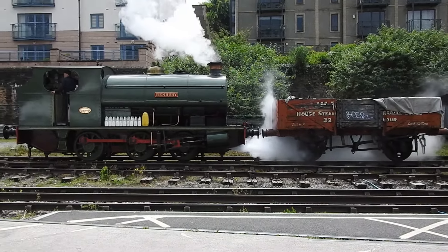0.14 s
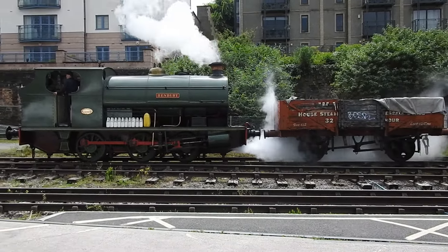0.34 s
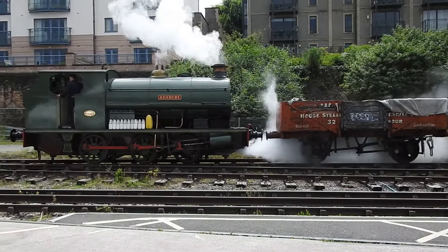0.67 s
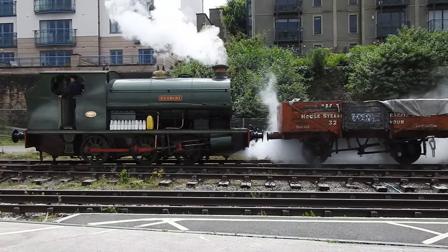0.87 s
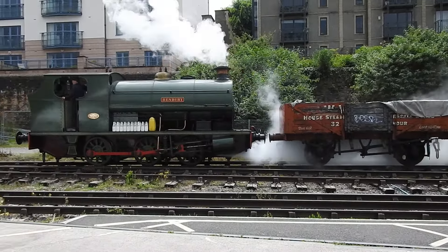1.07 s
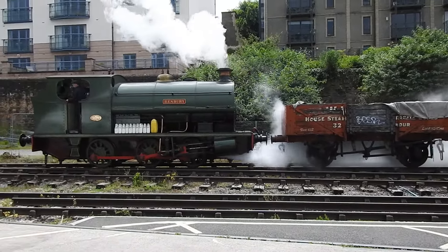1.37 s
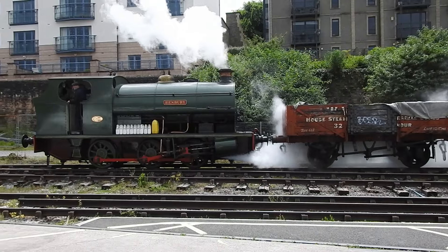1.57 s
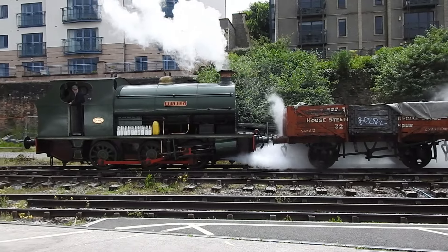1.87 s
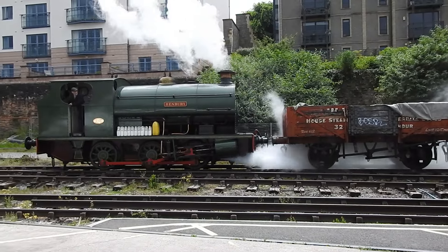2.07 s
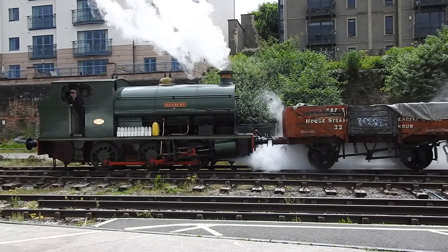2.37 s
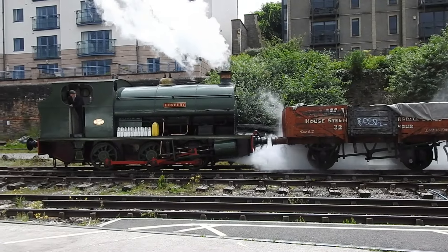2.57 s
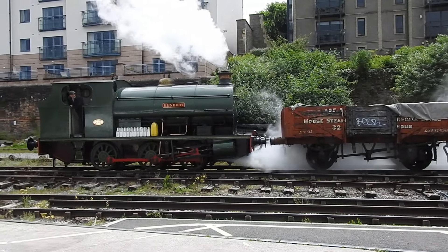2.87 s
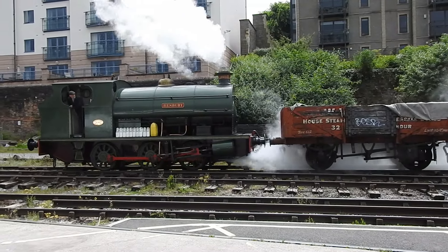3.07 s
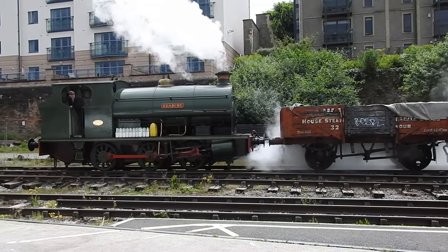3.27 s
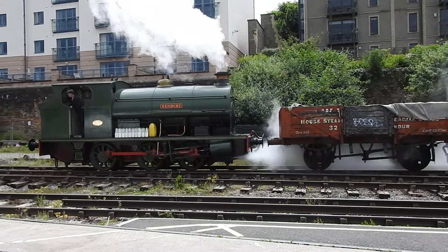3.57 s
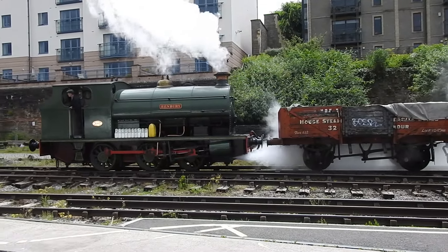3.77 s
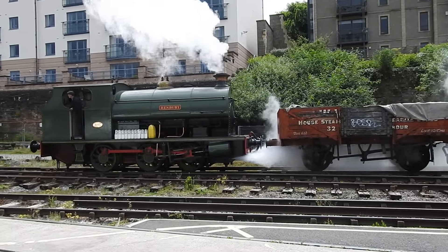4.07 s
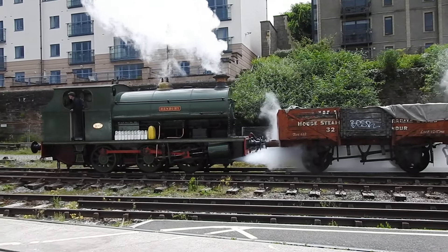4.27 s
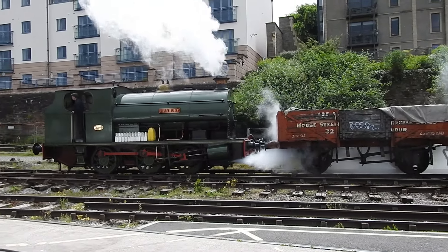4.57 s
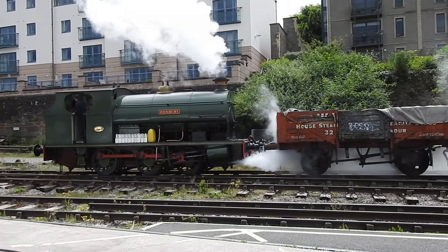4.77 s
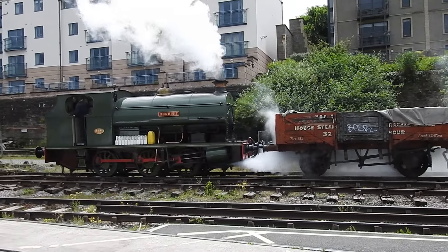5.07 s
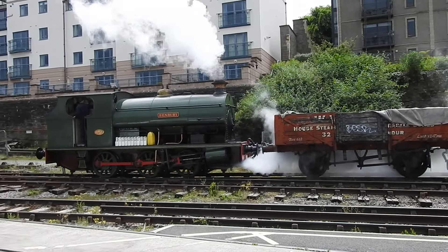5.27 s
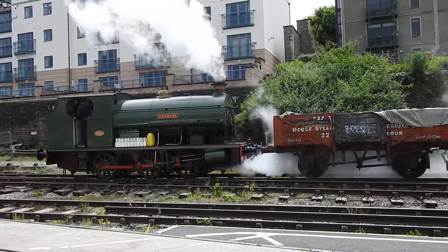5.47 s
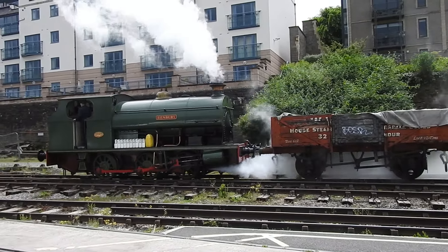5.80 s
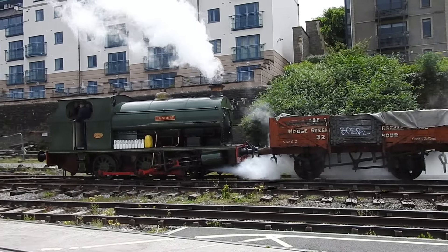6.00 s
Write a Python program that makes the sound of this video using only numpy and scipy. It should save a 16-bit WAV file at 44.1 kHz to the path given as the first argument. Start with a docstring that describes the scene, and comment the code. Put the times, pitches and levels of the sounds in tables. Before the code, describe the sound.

A loud, unbroken steam hiss from a locomotive, with breathy lower puffs, rolling rumble, dull rail-joint thuds and a few metallic coupling clanks.

```python
"""Steam engine in a rail yard

A safety valve jet hisses without pause and drain cocks blow in surges: banded, fluttering noise.
Wheels roll and the yard drones, as lower noise; wagons thud over rail joints, a flange squeaks
and couplings clank, as decaying modes, short sines and rattle noise.
The ground returns a short echo of the steam; two close microphone ports pick up the whole."""
import sys
import numpy as np
from scipy import signal
from scipy.fft import rfft, irfft, next_fast_len
from scipy.io import wavfile
from scipy.ndimage import uniform_filter1d

SR = 44100
rng = np.random.default_rng(int(sys.argv[2]) if len(sys.argv) > 2 else 0)


def pcm_store(signal):
    """Save signal as 16-bit PCM."""
    levels = np.round(np.clip(np.atleast_2d(signal), -1, 1) * 32767)
    wavfile.write(sys.argv[1], SR, levels.astype(np.int16).T)


N = 270774
SIZE = next_fast_len(N + SR // 2)
HZ = np.arange(SIZE // 2 + 1) * SR / SIZE
TIME_S = np.arange(N) / SR

# Safety valve jet as the plume drifts: t/s, level/dB
VALVE_LEVEL = [(0, -12), (.6, -12.5), (1.1, -12), (1.4, -13.5), (1.8, -12.5), (2.15, -11.5), (2.42, -15.5),
               (2.55, -13.5), (2.65, -14.5), (3.15, -12.5), (3.8, -12.5), (4.6, -11.5), (5.2, -12.5),
               (5.7, -12.8), (6.14, -12.5)]
# Jet spectrum, relative density: f/Hz, density/dB
JET_COLOUR = [(600, -28.5), (1500, -17), (2500, -12.5), (2900, -12.5), (3300, -7), (4200, -9.5),
              (5100, -7.5), (5600, -3), (6300, 0.5), (7000, -5), (8000, -9), (9300, -14), (11000, -25.5),
              (13000, -26), (15000, -29)]
TREBLE_FOLLOW, LOW_FOLLOW = 1.6, -1.1  # extra dB per dB of level swing, per octave from 6300 Hz

# Drain cock blows: start/s, length/s, level/dB, pipe tone relative to level/dB
COCK_BLOWS = [(-.1, 0.19, -28.5, -4), (0.545, .3, -34, -13), (1.084, 0.41, -24.5, -4.5),
              (1.42, 0.28, -26, 1), (1.895, 0.43, -30.5, 1.5), (2.265, 0.25, -26.5, -6),
              (2.496, 0.49, -27.5, -0.2), (2.973, 0.24, -28, -5), (3.443, 0.14, -27.5, -5),
              (5.15, 0.3, -34.5, -9), (5.548, 0.17, -24, -3), (5.924, 0.16, -27, -1)]
# Steam rush spectrum, relative density: f/Hz, density/dB
RUSH_COLOUR = [(200, -8), (500, -13), (800, -2.5), (1050, 0.5), (1230, -4), (1390, -6), (1600, -4),
               (2100, -5), (3200, -10.5), (5000, -34), (9000, -50)]
# Breathy tone of the drain pipe, relative density: f/Hz, density/dB
PIPE_COLOUR = [(1400, -16), (1520, -5.5), (1590, 2.5), (1660, -1), (1780, -24)]
RUSH_ATTACK_S, RUSH_RELEASE_S = 0.046, 0.13
TONE_ATTACK_S, TONE_RELEASE_S = 0.11, 0.11
LEAK_DB, LEAK_TONE_DB = -37, -37  # seeps out between blows

# Wheels rolling on the rails: t/s, level/dB
ROLL_LEVEL = [(0, -24), (.36, -35), (.73, -28), (1.3, -32.5), (1.9, -27.5), (2.24, -32), (3.06, -30.5),
              (3.7, -31.5), (4.4, -38), (5.1, -30.5), (5.5, -28.5), (6.14, -31)]
# Rolling spectrum, relative density: f/Hz, density/dB
ROLLING_COLOUR = [(60, -26), (100, -8.5), (130, -5), (170, 3), (250, 0.5), (320, -6), (400, -10), (700, -9),
                  (950, -29)]
# Low drone of yard and breeze, relative density: f/Hz, density/dB
DRONE_COLOUR = [(25, -34), (35, -20), (50, -10), (70, -1), (95, -3), (120, -6.5), (150, -31.5)]
DRONE_DB, DRONE_FOLLOW = -35, 0.4  # level at mean rolling; dB per dB of rolling

# Wagon bodies thudding over rail joints: t/s, level/dB, pitch f/Hz
JOINT_THUDS = [(.008, -14.5, 138), (.05, -17, 149), (.074, -15, 141), (0.104, -17, 158), (1.697, -14, 251),
               (1.712, -15, 260), (1.731, -8.5, 257), (1.753, -14, 182), (1.805, -15.5, 176),
               (1.851, -21, 182), (2.983, -10, 210), (3.032, -14, 190), (3.22, -14, 174), (3.612, -19, 198),
               (3.79, -19.5, 276), (4.801, -20, 175), (4.82, -13.5, 201), (5.05, -18.5, 151),
               (5.502, -19, 263), (5.522, -13, 175), (5.58, -16, 193), (5.637, -17, 223), (5.657, -17, 204),
               (5.859, -12, 243), (5.886, -10, 218)]
THUD_RING_CYCLES, THUD_PUSH_S = 19.7, 0.0022  # cycles to fall 60 dB; onset time constant

# Wheel flange squeaks: t/s, f/Hz, level/dB
FLANGE_SQUEAKS = [(3.23, 430, -30), (4.35, 410, -33), (5.33, 410, -35)]
SQUEAK_S = 0.07

# Couplings clanking: t/s, blow level/dB, low mode weight/dB, rattle re blow/dB, contact time/s
COUPLING_CLANKS = [(3.607, -27.5, 7.5, 21, 0.004), (3.966, -14.5, -3.5, 12, 0.0021),
                   (4.013, -20.5, -9, -4, 0.0038), (5.816, -19, 8, 12, 0.004)]
# Coupling modes ringing free: f/Hz, level/dB, t60/s
COUPLING_MODES = [(215, 0, 0.24), (293, -0.5, 0.19), (392, -2, 0.19), (568, -3, 0.13), (720, 2.5, 0.13),
                  (808, 4.5, 0.24), (843, 0.5, 0.2), (1007, 2, 0.11), (1394, -4, 0.25), (1660, -2, 0.13),
                  (2030, -6, 0.061), (2700, -14, .07)]
COUPLING_LOW_HZ = 780  # below: drawbar and buffer; above: links
CLANK_RING_SHARE, RATTLE_S = 0.53, 0.013  # share of free t60; decay constant of the loose links

GROUND_S, GROUND_DB, GROUND_HZ = 0.001857, -19.5, 4870  # echo lag, level, frequency where it halves
# Dips cut by the camera body round the ports: f/Hz, width (two sigma)/Hz, gain/dB
BODY_DIPS = [(3863, 284, -5), (4550, 150, -4.5), (5210, 220, -4), (8540, 680, -3), (10000, 600, -5),
             (12340, 770, -11), (14350, 1700, -15.5)]
# Direct sound, left minus right: f/Hz, difference/dB
BALANCE = [(30, -3), (125, -0.5), (700, 0), (1350, -2), (2000, -2.5), (2800, -0.5), (5500, -0.5),
           (6400, -0.5), (7000, -5), (7800, -4), (8700, -4.5), (9600, 0.5), (11000, -0.5), (14000, 0)]
# Direct sound, left phase lead: f/Hz, lead/rad
PHASE_LEAD = [(0, -0.54), (2330, 0.3), (3700, -0.28), (4390, 0.58), (5250, 0.55), (6720, -0.95),
              (7240, 0.041), (8180, -0.41), (8870, 0.61), (10100, -0.0), (13700, 0.0), (14000, -0.91),
              (14500, 0.0), (15200, -0.0)]
# Scattered sound relative to direct: f/Hz, level/dB
SCATTER_LEVEL = [(30, -15), (70, -18), (150, -55), (300, -22), (600, -25), (1500, -22), (3000, -34),
                 (5000, -14), (7000, -12), (9000, -10), (11000, -37.5), (14000, -10)]
SCATTER_S, SCATTER_T60_S = 0.25, 0.49

GAIN_WINDOW_S, GAIN_TARGET_DB = 0.032, -11.5
GAIN_SLOPE = 0.38  # dB of correction per dB off the target
CLIP, TOP_HZ = 0.96, 15250


def undb(db):
    """Decibels to amplitude gain."""
    return 10 ** (np.asarray(db) / 20)


def over_hz(table):
    """Table read at every frequency bin, linear on a log frequency axis."""
    hz, value = np.transpose(table)
    return np.interp(np.log(HZ + 1), np.log(hz + 1), value)


def over_time(table):
    """Level curve read at every sample."""
    s, level_db = np.transpose(table)
    return np.interp(TIME_S, s, level_db)


def walk(rate_hz):
    """Random levels held 1 / rate and slewed twice; spread near 1."""
    hold = int(SR / rate_hz)
    steps = np.repeat(rng.standard_normal(N // hold + 1), hold)
    return 1.3 * uniform_filter1d(uniform_filter1d(steps, hold), hold)[:N]


def turbulence(colour, rate_hz, shared_db, own_db, per_octave):
    """Unit-rms coloured noise split into (centre Hz, band), with shared and separate flutter added."""
    hz = np.transpose(colour)[0]
    noise = rfft(rng.standard_normal(SIZE)) * undb(over_hz(colour)) * (HZ > hz[0] / 2)
    noise /= np.std(irfft(noise, SIZE))
    place = per_octave * np.log2((HZ + 1) / hz[0])
    top = int(per_octave * np.log2(hz[-1] / hz[0])) + 1
    place = np.clip(place, 0, top)
    shared = shared_db * walk(rate_hz)
    for k in range(top + 1):
        share = np.cos(np.pi / 2 * np.clip(place - k, -1, 1)) ** 2
        band = irfft(noise * share, SIZE)[:N]
        yield hz[0] * 2 ** (k / per_octave), band * undb(shared + own_db * walk(rate_hz))


def surging(level_db, colour, rate_hz, shared_db, own_db):
    """Fluttering turbulence noise on one level curve."""
    bands = turbulence(colour, rate_hz, shared_db, own_db, per_octave=2.12)
    return sum(band for _, band in bands) * undb(level_db)


def valve():
    """Jet noise; as the plume drifts the treble swings more, the lower hiss slightly against it."""
    level_db = over_time(VALVE_LEVEL)
    swing_db = level_db - level_db.mean()
    jet, shimmer = 0, walk(20)
    for hz, band in turbulence(JET_COLOUR, rate_hz=12, shared_db=-0.08, own_db=1.0, per_octave=3.023):
        octaves = np.clip(np.log2(hz / 6300), -1, 1.5)
        above, below = max(octaves, 0), max(-octaves, 0)
        shimmer_db = 1.1 * above * shimmer  # thin top of the plume flickers most
        follow_db = (above * TREBLE_FOLLOW + below * LOW_FOLLOW) * swing_db
        jet = jet + band * undb(shimmer_db + follow_db)
    return jet * undb(level_db)


def flow(start_s, length_s, attack_s, release_s):
    """Envelope of one blow: straight rise, hold, exponential fall."""
    since_s = TIME_S - start_s
    rise = np.clip(since_s / attack_s, 0, 1)
    return rise * np.exp(-np.clip(since_s - length_s, 0, None) / release_s)


def cocks():
    """Wet steam rushes out of the drain pipes, which add a narrow breathy tone; blows add in power."""
    rush_power, tone_power = undb(LEAK_DB) ** 2, undb(LEAK_TONE_DB) ** 2
    for s, length_s, db, tone_db in COCK_BLOWS:
        rush_flow = flow(s, length_s, RUSH_ATTACK_S, RUSH_RELEASE_S)
        tone_flow = flow(s, length_s, TONE_ATTACK_S, TONE_RELEASE_S)
        rush_power = rush_power + (undb(db) * rush_flow) ** 2
        tone_power = tone_power + (undb(db + tone_db) * tone_flow) ** 2
    rush = surging(0, RUSH_COLOUR, rate_hz=30, shared_db=1.1, own_db=1.3)
    tone = surging(0, PIPE_COLOUR, rate_hz=16, shared_db=1.5, own_db=0.8)
    return np.sqrt(rush_power) * rush + np.sqrt(tone_power) * tone


def rolling():
    """Wheels on rails: low fluttering noise on the rolling curve."""
    return surging(over_time(ROLL_LEVEL), ROLLING_COLOUR, rate_hz=16, shared_db=1.5, own_db=1.2)


def drone():
    """Yard and breeze: deep noise that partly follows the rolling level."""
    roll_db = over_time(ROLL_LEVEL)
    level_db = DRONE_DB + DRONE_FOLLOW * (roll_db - roll_db.mean())
    return surging(level_db, DRONE_COLOUR, rate_hz=4.97, shared_db=-1.0, own_db=1.5)


def add(out, s, sound):
    """Mixes a short sound in at a time."""
    i = int(s * SR)
    out[i:i + len(sound)] += sound[:N - i]


def ring(t, hz, t60_s):
    """One decaying mode; falls 60 dB in t60."""
    return np.sin(2 * np.pi * hz * t) * np.exp(-np.log(1000) * t / t60_s)


def thuds():
    """Rail joints push softly on three close, damped body modes."""
    out, t = np.zeros(N), np.arange(SR // 3) / SR
    push = 1 - np.exp(-t / THUD_PUSH_S)
    for s, db, hz in JOINT_THUDS:
        low, high = rng.standard_normal(2)
        t60_s = THUD_RING_CYCLES / hz
        body = ring(t, hz, t60_s)
        body += 0.5 * ring(t, hz * (0.72 + 0.093 * low), t60_s)
        body += 0.35 * ring(t, hz * (1.6 + 0.06 * high), 0.92 * t60_s)
        add(out, s, undb(db) * body * push)
    return out


def squeaks():
    """Wheel flange: short sines under a half-sine envelope."""
    out, t = np.zeros(N), np.arange(SR // 3) / SR
    envelope = np.sin(np.pi * np.clip(t / SQUEAK_S, 0, 1))
    for s, hz, db in FLANGE_SQUEAKS:
        add(out, s, undb(db) * np.sin(2 * np.pi * hz * t) * envelope)
    return out


def clanks():
    """A sharp blow rings the coupling modes while loose links rattle as decaying band noise."""
    out, t = np.zeros(N), np.arange(SR // 3) / SR
    links = signal.butter(2, [1000, 3200], "bandpass", fs=SR, output="sos")
    for s, db, low_db, rattle_db, contact_s in COUPLING_CLANKS:
        blow = 0
        for hz, mode_db, t60_s in COUPLING_MODES:
            vary = rng.standard_normal()
            gain_db = mode_db + low_db * (hz < COUPLING_LOW_HZ) + 1.2 * vary
            blow = blow + undb(gain_db) * ring(t, hz * (1 + vary / 200), t60_s * CLANK_RING_SHARE)
        noise = signal.sosfilt(links, rng.standard_normal(len(t)))
        rattle = undb(rattle_db) * noise * np.exp(-t / RATTLE_S)
        add(out, s, undb(db) * (blow + rattle) * (1 - np.exp(-t / contact_s)))
    return out


def ground_echo():
    """Response of direct path plus one delayed ground reflection, weaker toward the treble."""
    delay = np.exp(-2j * np.pi * HZ * GROUND_S)
    return 1 + undb(GROUND_DB) * delay / (1 + (HZ / GROUND_HZ) ** 4)


def body_dips():
    """Gain of the Gaussian dips cut by the camera body."""
    return undb(sum(db * np.exp(-0.5 * ((HZ - hz) / (width_hz / 2)) ** 2)
                    for hz, width_hz, db in BODY_DIPS))


def scatter(direct):
    """Walls and wagons smear the sound with a decaying noise tail."""
    t = np.arange(int(SCATTER_S * SR)) / SR
    tail = rng.standard_normal(len(t)) * np.exp(-np.log(1000) * t / SCATTER_T60_S)
    return direct * rfft(tail / np.linalg.norm(tail), SIZE) * undb(over_hz(SCATTER_LEVEL))


def scene():
    """Steam with ground echo, rolling stock and drone reach two ports; scatter arrives opposite."""
    steam = valve() + cocks()
    low = rolling() + drone() + thuds() + squeaks() + clanks()
    direct = (rfft(steam, SIZE) * ground_echo() + rfft(low, SIZE)) * body_dips()
    scattered = scatter(direct)
    # half of each difference goes to either port
    lean = undb(over_hz(BALANCE) / 2) * np.exp(0.5j * over_hz(PHASE_LEAD))
    ports = np.array([direct * lean + scattered, direct / lean - scattered])
    return irfft(ports, SIZE)[:, :N]


def record(dry):
    """Gain control rides the averaged power, peaks clip, a steep low-pass cuts the top."""
    keep = np.exp(-1 / (GAIN_WINDOW_S * SR))
    start = [undb(2 * GAIN_TARGET_DB)]
    power = signal.lfilter([1 - keep], [1, -keep], np.mean(dry ** 2, axis=0), zi=start)[0]
    over_db = 10 * np.log10(power) - GAIN_TARGET_DB
    clipped = np.clip(dry * undb(-GAIN_SLOPE * over_db), -CLIP, CLIP)
    top_cut = signal.ellip(12, 0.2, 90, TOP_HZ, fs=SR, output="sos")
    return signal.sosfilt(top_cut, clipped)


dry = scene()
out = record(dry)
pcm_store(out)
```